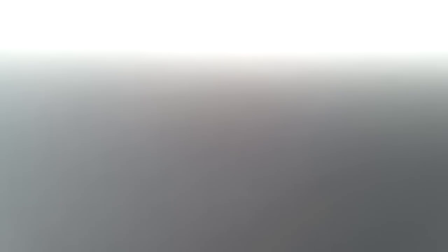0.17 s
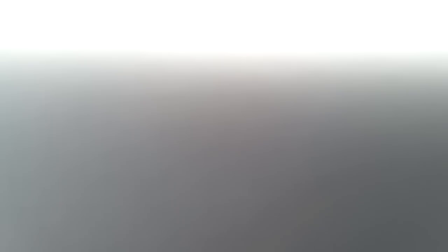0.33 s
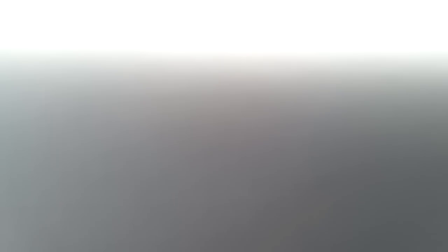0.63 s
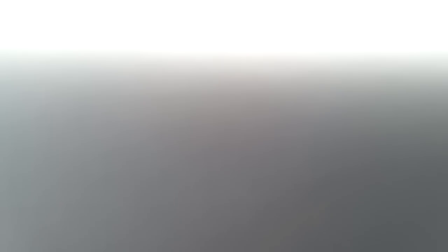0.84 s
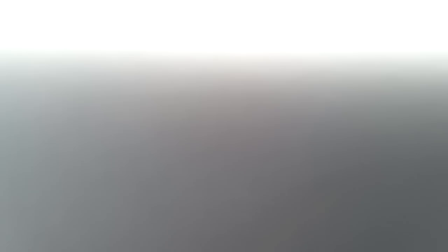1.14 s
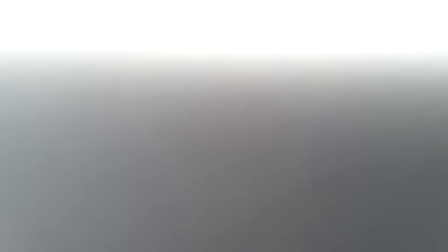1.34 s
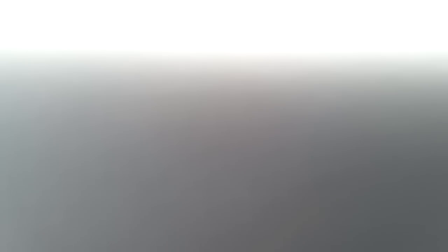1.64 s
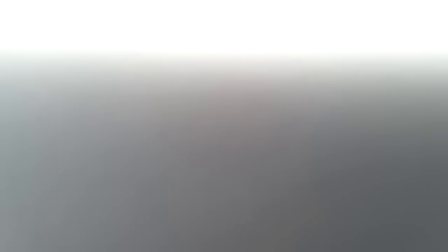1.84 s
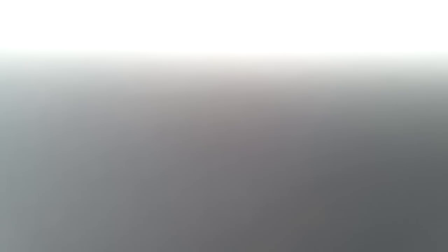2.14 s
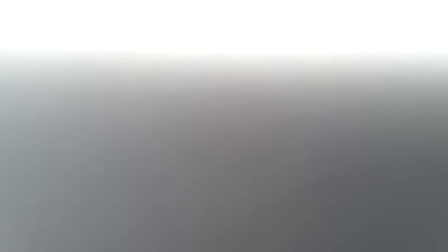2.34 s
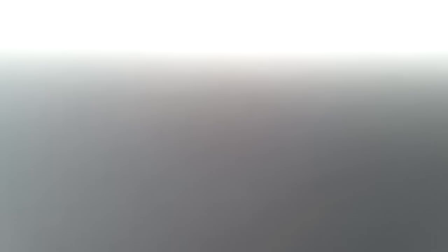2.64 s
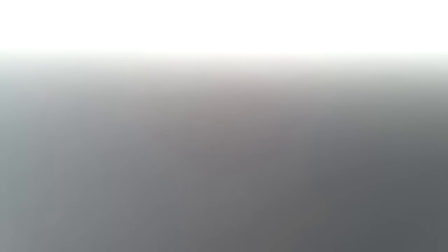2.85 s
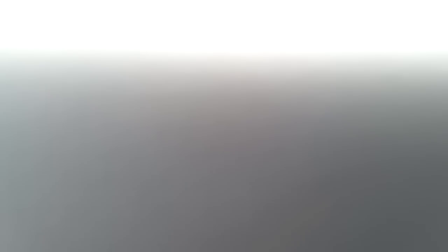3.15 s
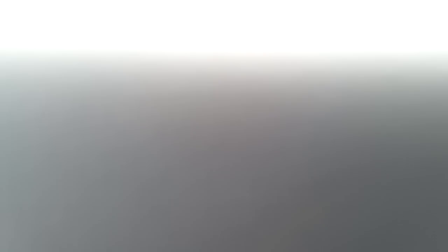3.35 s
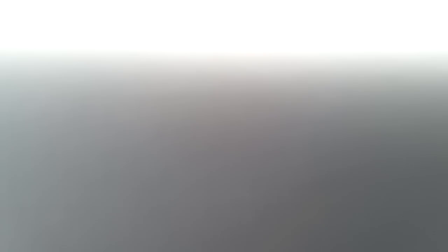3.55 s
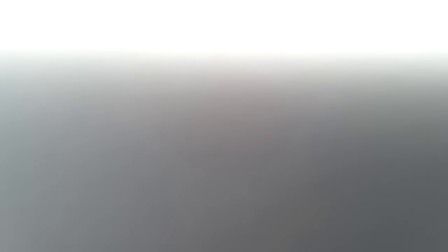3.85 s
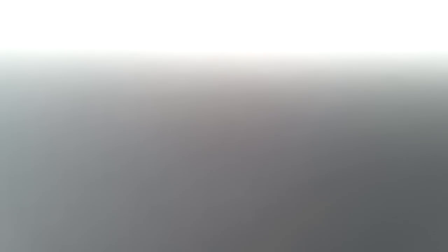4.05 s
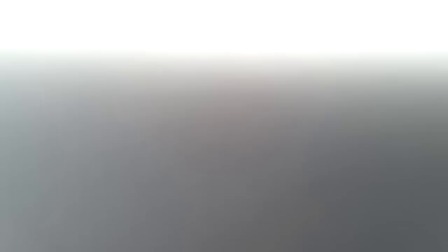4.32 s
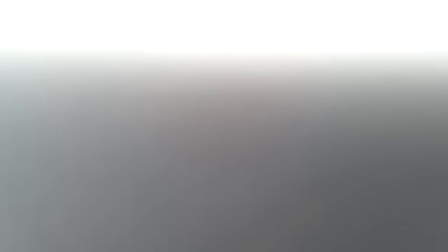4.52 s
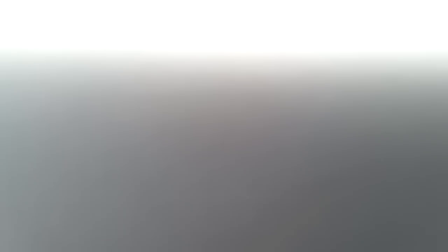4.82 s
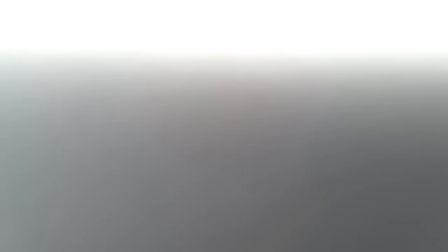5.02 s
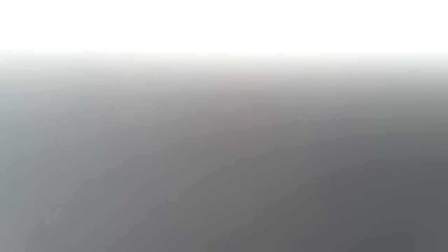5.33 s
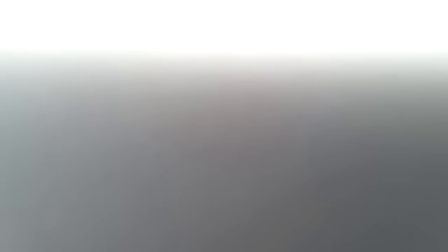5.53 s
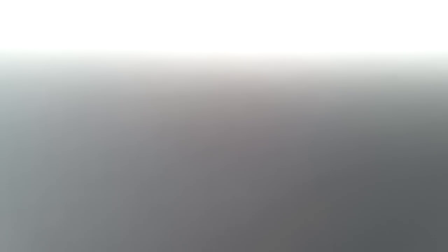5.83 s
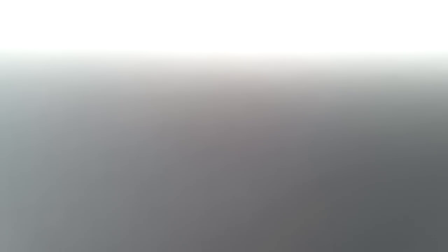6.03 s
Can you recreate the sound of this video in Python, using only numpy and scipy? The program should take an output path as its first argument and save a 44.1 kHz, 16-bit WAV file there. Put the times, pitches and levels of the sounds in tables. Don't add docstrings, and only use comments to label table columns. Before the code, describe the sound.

At a kerbside, a small close microphone overloads on a six-cylinder car idling. From 0 to 1.26 s loose gears clash roughly 22 times a second over dull grinding, slowly rising and falling in force, growing crisper and harder from 0.7 s. Around 1.3 s the clatter falls away with a short knock, leaving a low exhaust drone, light valve ticking and faint belt hum. At 2.3 s the engine is cut: panels ring softly, pitch sinks and firings separate into slowing, shuddering puffs until about 3.2 s, while leaking air hisses and whistles thinly in two spells, fading by 3.6 s. At 3.82 s a door lands with a solid, resonant thud and quick shudders, latching by 4.06 s. Subdued street roar and a very faint fan whine remain. Tyres swell around 5.2-5.5 s, with a hollow knock at 5.45 s and distant engine rumble towards 6 s.

```python
import sys
import numpy as np
from scipy import signal
from scipy.fft import rfft, irfft
from scipy.io import wavfile

SR = 44100
rng = np.random.default_rng(int(sys.argv[2]) if len(sys.argv) > 2 else 0)


def log_audio(samples):
    frames = np.atleast_2d(samples).T
    limited = np.clip(frames, -1, 1)
    pcm = np.round(limited * 32767).astype(np.int16)
    wavfile.write(sys.argv[1], SR, pcm)


def elevation(decibels):
    levels = np.asarray(decibels, float)
    return 10 ** (levels / 20)


N = 272538
TIME = np.arange(N) / SR

FIRST_TICK_S, CLUTCH_S, CUT_S, DOOR_SHUT_S = .0333, 1.258, 2.31, 4.06
HUNT_S, HUNT_TOP_S = .84, .28
LOOSEN_S, LOOSEN_DB_PER_S = .7, 6.0


def in_time(rows):
    s, *columns = np.transpose(rows)
    return [np.interp(TIME, s, c) for c in columns]


def at_hz(points, hz):
    point_hz, point_db = np.array(points).T
    return np.interp(np.log(hz), np.log(point_hz), point_db)


def after(s):
    return np.maximum(TIME - s, 0)


def swell(top_s, rise_s, fall_s):
    return -9 * ((TIME - top_s) / np.where(TIME < top_s, rise_s, fall_s)) ** 2


def joined(*levels_db):
    return 10 * np.log10(sum(elevation(db) ** 2 for db in levels_db) + 1e-20)


def filtered(x, order, hz, kind="low"):
    return signal.sosfilt(signal.butter(order, hz, kind, fs=SR, output="sos"), x)


def drift(rate_hz):
    sos = signal.butter(2, rate_hz, fs=SR / 20, output="sos")
    slow = signal.sosfilt(sos, rng.standard_normal(N // 20 + 4000))[-N // 20 - 2:]
    return np.interp(np.arange(N) / 20, np.arange(len(slow)), slow / slow.std())


def grit(spread_db):
    g = rng.standard_normal(N) * elevation(spread_db * drift(400))
    return g / g.std()


def burst(s, db, t60, attack_s=0.0011):
    out, first = np.zeros(N), int(s * SR) + 1
    since = TIME[first:first + int(2 * t60 * SR)] - s
    out[first:first + len(since)] = elevation(db - 60 * since / t60) * (1 - np.exp(-since / attack_s))
    return out


def resonance(x, hz, width_hz):
    r = np.exp(-np.pi * width_hz / SR)
    poles = [1, -2 * r * np.cos(2 * np.pi * hz / SR), r * r]
    return signal.lfilter(np.array([1, 0, -1]) * (1 - r * r) / 2, poles, x)


def body(x, colour, modes):
    size = 2 ** 15
    hz = np.maximum(np.arange(size // 2 + 1) * SR / size, 1)
    humps_db = sum(top / (1 + (2 * (hz - mid) / wide) ** 2) for mid, wide, top in modes)
    gain = elevation(at_hz(colour, hz) + humps_db)
    cepstrum = irfft(np.log(gain / np.sqrt(np.mean(gain ** 2))))
    cepstrum[1:size // 2] *= 2
    cepstrum[size // 2 + 1:] = 0
    return signal.oaconvolve(x, irfft(np.exp(rfft(cepstrum))))[:N]


def pressure(rate):
    idle = -21 + np.minimum(1.4 * TIME, 2.1)
    coast = -14.6 + 2.4 * 20 * np.log10(rate / rate[0]) - 250 * after(3.13)
    emptying = -5.0 * np.exp(-((TIME - 2.51) / .065) ** 2)
    rock_growth = np.minimum(after(CUT_S) / .3, 1) ** 2
    rocking = 2.5 * rock_growth * np.cos(2 * np.pi * 7.4 * (TIME - 2.75))
    missed = -18 * np.exp(-((TIME - CUT_S) / .016) ** 2)
    return np.where(TIME < CUT_S, idle, coast + emptying + rocking) + missed


def exhaust(rate, firings):
    # f/Hz, level/dB
    silencer = [(20, -54), (45, -40), (65, -15), (87, -23), (100, -4.5), (125, 0.5), (140, -2.5),
                (155, -14.5), (172, -37), (220, -29.5), (265, -35.5), (400, -31.5), (480, -46.5)]
    lead_firings, echo_s = .05, .046
    orders = 0
    for k in range(1, 16):
        hz = k * rate
        silencer_phase = 2 * np.arctan((hz - 125) / 25)
        orders = orders + elevation(at_hz(silencer, hz)) * np.cos(2 * np.pi * k * (firings + lead_firings) - silencer_phase)
    puffs = np.sqrt(2) * elevation(pressure(rate) + .5 * drift(16)) * orders
    lag = round(echo_s * SR)
    puffs[lag:] += elevation(-9.5) * puffs[:-lag]
    return puffs * elevation(-1.0)


def clashes(rate):
    odd_turns = [6, 10, 16, 18, 19, 20, 23]
    odd_db = [2.5, 3.5, -4, 2.2, 2.4, -2.5, 1.5]
    # t/s, peak level/dB
    rebounds = [(.0574, -9), (.2374, -5), (.2867, -4), (.3316, -7), (.3671, -6), (.4204, -7), (.6934, -8),
                (.7414, -11), (.835, -8), (.8839, -6), (.9258, -9), (1.1514, -8), (1.1974, -9),
                (1.2466, -6), (1.2915, -6), (1.3399, -10), (1.3982, -15)]
    bright_db, spread_db, early_s, jitter_s = -16, .9, .0017, .001
    s = np.arange(FIRST_TICK_S, CLUTCH_S, 2 / rate[0])
    chance = rng.standard_normal((len(s), 3))
    hunt_db = 2.0 * np.cos(2 * np.pi * (s - HUNT_TOP_S) / HUNT_S)
    loosen_db = LOOSEN_DB_PER_S * np.maximum(s - LOOSEN_S, 0)
    db = -4.3 + .4 * loosen_db + .3 * hunt_db + spread_db * chance[:, 0]
    db[odd_turns] += odd_db
    bright = bright_db + loosen_db + .7 * hunt_db + spread_db * chance[:, 1]
    turns = zip(s - early_s + jitter_s * chance[:, 2], db, bright)
    return list(turns) + [(s, db, bright_db) for s, db in rebounds]


def gears(rate, firings):
    # f/Hz, level/dB per Hz
    case_colour = [(120, -48), (200, -25.5), (327, -8.5), (434, -9), (578, -3), (720, -6.8), (1020, -1.5),
                   (1890, -5.5), (2080, -3.5), (2770, -9), (7270, -23.5), (8790, -30), (11400, -74.5),
                   (19300, -120)]
    # f/Hz, width/Hz, level over colour/dB
    case_modes = [(334, 40, 4), (570, 20, 7), (600, 60, 4), (1045, 50, 5), (1185, 40, 4), (1365, 120, 4),
                  (1650, 70, 6), (2060, 110, 6), (2260, 140, 4.5), (3040, 90, 3), (3300, 160, 5.5),
                  (4250, 160, 3), (4780, 200, 3.5), (5290, 300, 3.5)]
    freed_db = -11 * np.minimum(after(CLUTCH_S) / .025, 1) - 100 * after(CLUTCH_S)
    hunt_db = .5 * np.cos(2 * np.pi * (TIME - HUNT_TOP_S) / HUNT_S)
    grind = elevation(-15.2 + hunt_db - .4 * LOOSEN_DB_PER_S * after(LOOSEN_S) + freed_db)
    hits = clashes(rate)
    clash = sum(burst(s, 1.15 * db - 4.6, .085, attack_s=.0018) for s, db, bright in hits)
    sharp = sum(burst(s, .7 * (db + bright) + 0.8, 0.045, attack_s=0.00038) for s, db, bright in hits)
    teeth = grit(1.0)
    edge = filtered(teeth * sharp, 2, 2200, "high")
    dull = filtered(grit(1.5) * grind * elevation(2.0 * drift(30)), 1, 4500)
    thin = filtered(teeth * clash, 1, 600, "high")
    turn = np.diff(np.floor(firings / 2), prepend=-1)
    blow = elevation(33) * filtered(turn * grind, 2, [330, 800], "band")
    return elevation(-0.72) * body(dull + thin + edge + blow, case_colour, case_modes)


def block(rate, firings):
    # f/Hz, level/dB per Hz
    block_colour = [(100, -28), (170, -5), (211, -20), (318, -10), (421, -9.5), (481, -9.5), (776, -14),
                    (2060, -12), (2770, -25), (6860, -23), (8790, -30.5), (11400, -68), (19300, -120)]
    # f/Hz, width/Hz, level over colour/dB
    block_modes = [(1060, 60, 5), (2050, 140, 3.5), (3330, 450, 4), (4260, 250, 3), (5340, 300, 2),
                   (6700, 300, 1.5)]
    freed_s, split_hz = 1.41, 2700
    running_db = -25.4 + 1.55 * 20 * np.log10(rate / rate[0])
    level_db = joined(running_db, -43) - 150 * after(3.6)
    bright_db = np.select([TIME < freed_s, TIME < CUT_S], [-1.5, -4.3], -6.0)
    stroke = firings + .1
    weak_db = -4 * (np.floor(stroke) % 2)
    tick = elevation(weak_db) * np.exp(-(stroke % 1) / 0.21) * np.where(TIME < CUT_S, 1, 0.45)
    noise = body(grit(1.2) * (1 + 0.29 * tick), block_colour, block_modes)
    ticks = body(grit(2.5) * (0.51 + 0.85 * tick), block_colour, block_modes)
    low = filtered(noise, 4, split_hz)
    high = filtered(ticks, 4, split_hz, "high")
    return elevation(level_db) * (low + elevation(bright_db + 8.0) * high)


def belt(rate, firings):
    multiples = [3.722, 7.444, 10.787, 11.166, 14.888]
    hum_levels = [-38.5, -33.5, -37.5, -35.5, -43.5]
    hums = 0
    for k, db in zip(multiples, hum_levels):
        hums = hums + np.sqrt(2) * elevation(db + 0.68 * drift(4.4)) * np.sin(2 * np.pi * k * firings)
    return elevation(-70 * (1 - rate / rate[0])) * hums


def leak():
    # start t/s, end t/s, start level/dB, end level/dB
    spells = [
        (2.445, 2.85, -41.5, -42),
        (2.94, 3.21, -46.5, -43.5),
    ]
    gates_db = [-380 * np.maximum(start - TIME, 0) - 150 * after(end) for start, end, *_ in spells]
    high_db = joined(*(gate + np.interp(TIME, row[:2], row[2:]) for gate, row in zip(gates_db, spells)))
    low_db = gates_db[0] - 36 - 10 * after(spells[0][0]) + 4.0 * drift(18)
    air = rng.standard_normal((3, N))
    bands = (6930, 220), (2025, 110), (6800, 6000)  # Hz, width Hz
    high, low, hiss = (resonance(resonance(a, hz, w), hz, w) for a, (hz, w) in zip(air, bands))
    bright = high / high.std() + elevation(0.3) * hiss / hiss.std()
    return elevation(high_db - 0.6 + 2.2 * drift(25)) * bright + elevation(low_db - 3.5) * low / low.std()


def thin_whistle():
    hz = 3240 + 16000 * np.minimum(after(3.35), .5) ** 2
    phase = 2 * np.pi * np.cumsum(hz) / SR
    on = np.clip(np.minimum(TIME - CUT_S, 3.6 - TIME) / .04, 0, 1)
    level = on * elevation(-52.5 - 5.0 * after(CUT_S)) * elevation(3.0 * drift(14))
    return level * (drift(150) * np.cos(phase) + drift(150) * np.sin(phase))


def door():
    # t/s, level/dB, decay/s
    door_blows = [
        (3.823, -10.5, 0.12),
        (3.836, -12.5, .12),
        (3.873, -14, 0.13),
        (3.918, -20, 0.12),
        (3.953, -25.5, 0.41),
        (4.012, -33, 0.22),
    ]
    # f/Hz, level/dB per Hz
    door_colour = [(29, -82), (50, -35), (222, -6), (343, -13.5), (495, -5.5), (576, -10.5), (670, -8),
                   (1460, -13.5), (1850, -19.5), (7080, -57), (8790, -59), (11400, -92), (19300, -120)]
    # f/Hz, width/Hz, level/dB
    door_modes = [(237, 40, -3), (506, 33, 1), (660, 40, 3), (899, 50, 3), (1020, 40, -8), (1217, 50, 7),
                  (1500, 38, 5.5)]
    held = np.clip((DOOR_SHUT_S - TIME) / 0.016, 0, 1)
    blows = sum(burst(s, db - 2.0, t60, attack_s=0.0025) for s, db, t60 in door_blows)
    return held * body(grit(2.2) * blows, door_colour, door_modes)


def rings():
    # t/s, peak level/dB, decay/s, f/Hz
    panel_notes = [(2.35, -20.5, .35, 360), (2.362, -23, .3, 388), (2.408, -23, 0.16, 347),
                   (2.46, -28, .4, 429), (3.825, -11.5, 0.1, 499), (3.832, -24, 0.11, 300),
                   (3.834, -15.5, .12, 894), (3.846, -15, 0.069, 1507), (3.852, -16.5, 0.15, 237),
                   (3.872, -11.5, 0.13, 506), (3.882, -17, 0.1, 684), (3.9, -23, .2, 222.4),
                   (3.917, -16, .13, 512), (4.01, -30, 0.13, 660), (5.446, -18, 0.07, 849),
                   (5.457, -25, 0.11, 802)]
    out = 0
    for s, db, t60, hz in panel_notes:
        out = out + burst(s, db, t60, attack_s=2.5 / hz) * np.sin(2 * np.pi * hz * (TIME - s))
    return out


def knocks():
    # t/s, level/dB, decay/s, centre f/Hz, width/Hz
    knock_rows = [(1.291, -20, .1, 2500, 3000), (3.2, -38, 0.14, 5700, 3000), (3.819, -40, .2, 5500, 3000),
                  (3.832, -27.5, 0.074, 2700, 900), (3.876, -35, 0.097, 2500, 900),
                  (4.04, -39, 0.12, 3200, 1500), (4.04, -37, .1, 7300, 2500), (5.3, -41, .1, 5500, 2000),
                  (5.446, -22, 0.12, 780, 450), (5.446, -28, 0.1, 4500, 3500),
                  (5.446, -29, 0.15, 2600, 1500)]
    noise = rng.standard_normal(N)
    out = 0
    for s, db, t60, hz, w in knock_rows:
        struck = resonance(resonance(noise * burst(s, db, t60), hz, w), hz, 2 * w)
        out = out + struck * np.sqrt(SR / np.pi / w)
    return out


def far():
    # t/s, level/dB
    fan_levels = [
        (2.3, -90),
        (3.4, -59),
        (5.0, -61),
        (5.7, -72),
    ]
    tyres = resonance(rng.standard_normal(N), 910, 220)
    top_s = 5.2
    hum_db = joined(-33.5 + swell(top_s, .05, .4), -48 + swell(top_s, .3, .3))
    tones = (2002, 0), (4004, -3)  # Hz, dB
    whine = sum(elevation(db + 1.2 * drift(6)) * np.sin(2 * np.pi * hz * TIME) for hz, db in tones)
    return elevation(hum_db - 4.0 + 1.5 * drift(19)) * tyres / tyres.std() + elevation(in_time(fan_levels)[0]) * whine


def street():
    # top t/s, rise/s, fall/s, roar level/dB, rumble level/dB
    swell_rows = [
        (3.93, .07, .11, -37, -32),
        (5.47, .27, .34, -33, -65),
        (5.7, .22, 1.1, -43, -45),
    ]
    # f/Hz, level/dB per Hz
    street_colour = [(18, -51), (30, -24), (71, -6.5), (141, -4.5), (226, -4.5), (347, -8.5), (520, -5),
                     (725, -5), (919, -4.5), (1170, -3), (2060, -10.5), (2880, -24.5), (6930, -25.5),
                     (8790, -33.5), (11400, -81.5), (19300, -120)]
    # f/Hz, width/Hz, level/dB
    street_modes = [(900, 200, 1), (1320, 250, 1)]
    duck_db = 2.9 * (TIME > DOOR_SHUT_S) * np.exp(-after(DOOR_SHUT_S) / 2.5)
    roar_db = joined(-34.9 - duck_db, *(roar + swell(*shape) for *shape, roar, rumble in swell_rows))
    rumble_db = joined(-45.8, *(rumble + swell(*shape) for *shape, roar, rumble in swell_rows))
    air = body(rng.standard_normal(N), street_colour, street_modes)
    low = elevation(rumble_db + 8.0 + .8 * drift(6.1)) * filtered(air, 3, 400)
    mid = elevation(roar_db + 1.1 * drift(8)) * filtered(air, 3, [400, 2600], "band")
    top = elevation(0.43 * roar_db - 22) * filtered(air, 3, 2600, "high")
    return low + mid + top


def scene():
    # t/s, firing rate/Hz
    crank_rows = [
        (0, 43.74),
        (2.29, 43.74),
        (2.55, 33),
        (2.75, 23),
        (2.9, 18.3),
        (3.05, 12),
        (3.2, 7.8),
        (3.4, 5),
    ]
    rate, = in_time(crank_rows)
    firings = np.cumsum(rate) / SR - FIRST_TICK_S * rate[0]
    car = exhaust(rate, firings) + gears(rate, firings) + block(rate, firings) + belt(rate, firings)
    car = car + leak() + thin_whistle()
    return (car + door() + rings() + knocks() + far() + street())[None]


def low_pass(x):
    return signal.sosfilt(signal.butter(12, 15830, fs=SR, output="sos"), x)


def record(dry):
    steep_top = signal.cheby2(12, 60, 9350, fs=SR, output="sos")
    low_cut = signal.butter(2, 35, "high", fs=SR, output="sos")
    narrow = signal.sosfilt(np.vstack([steep_top, low_cut]), np.clip(dry, -.655, .655))
    return low_pass(np.clip(narrow, -.722, .722))


dry = scene()
out = record(dry)
log_audio(out)
```